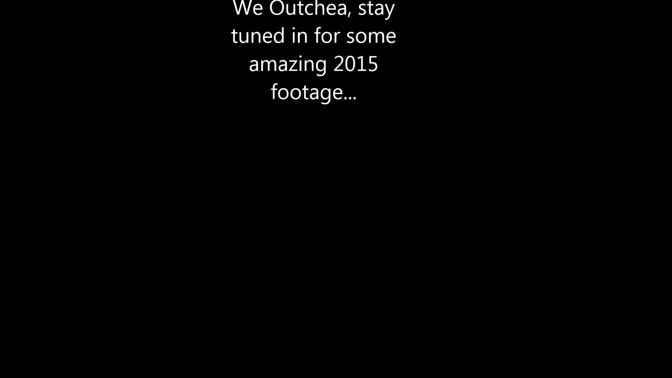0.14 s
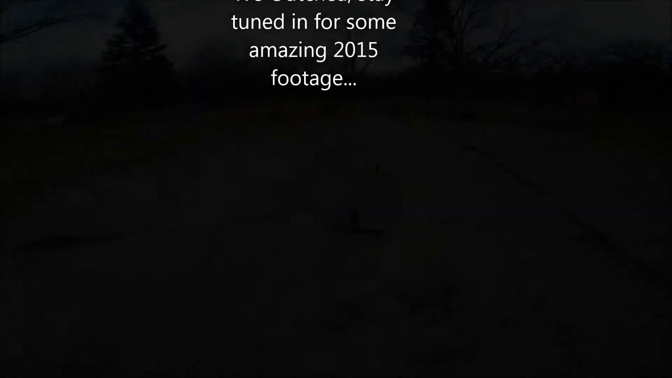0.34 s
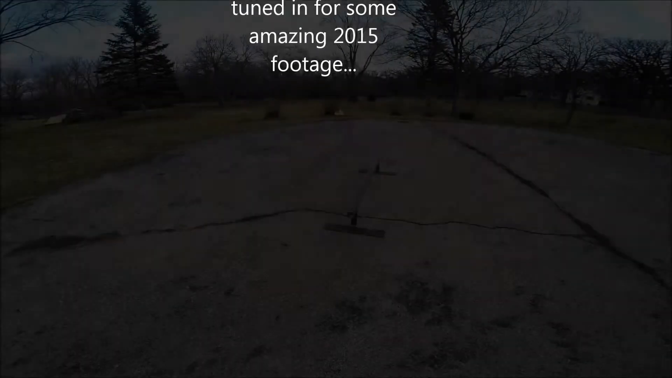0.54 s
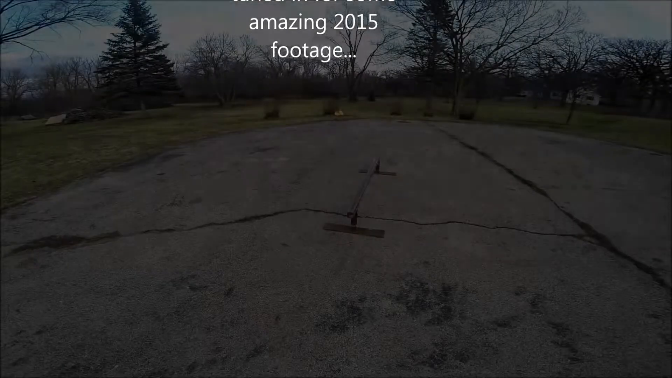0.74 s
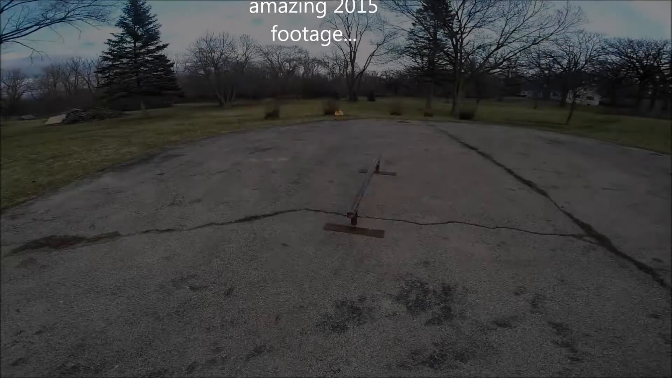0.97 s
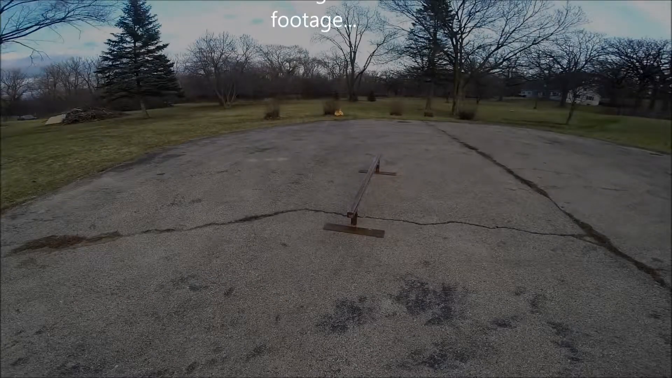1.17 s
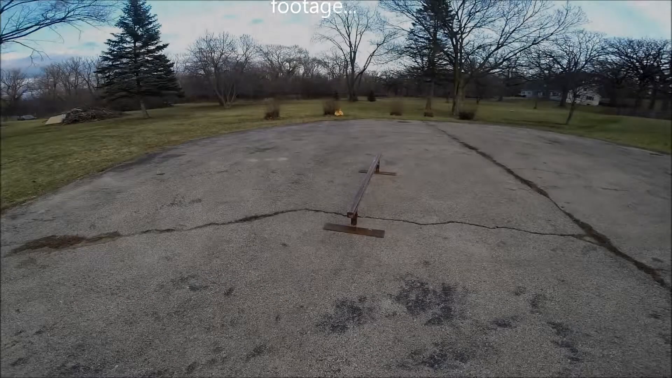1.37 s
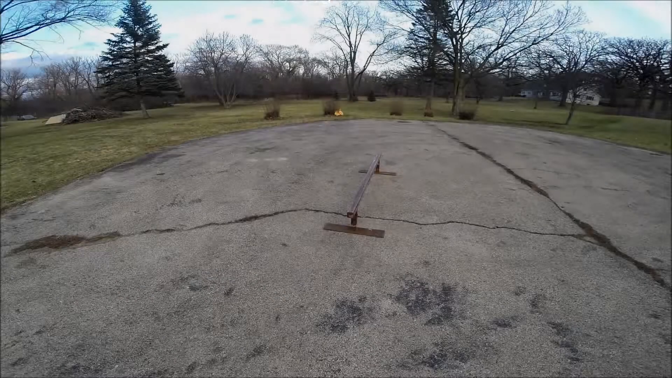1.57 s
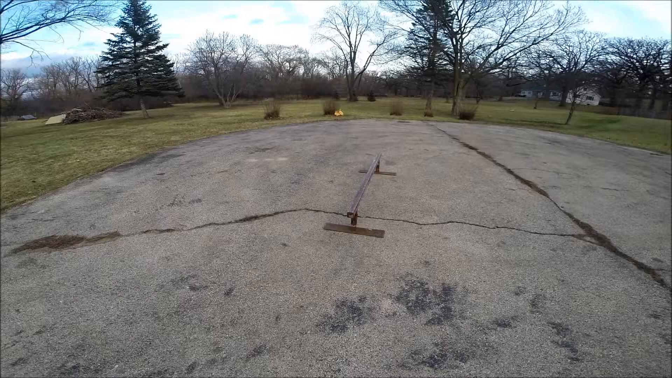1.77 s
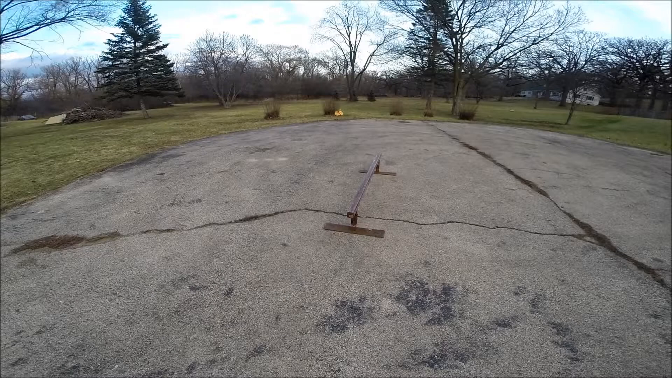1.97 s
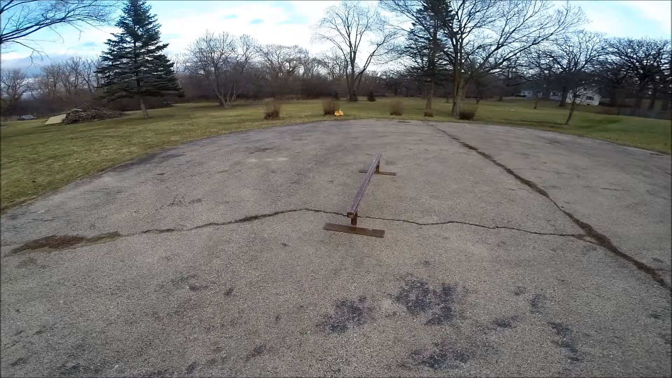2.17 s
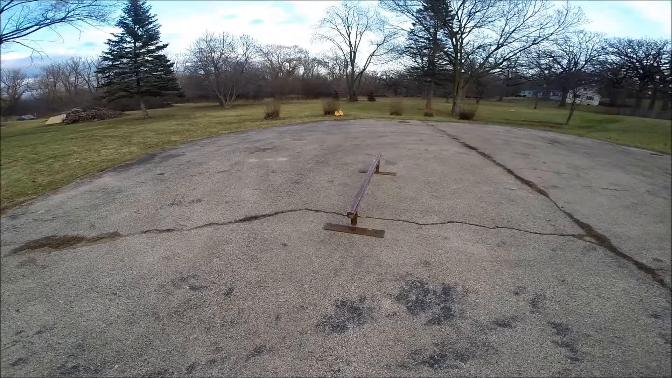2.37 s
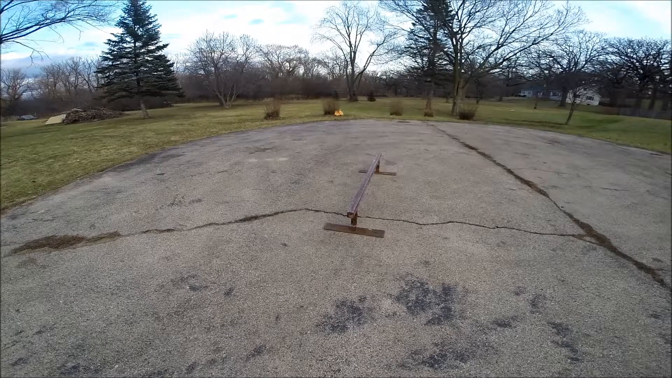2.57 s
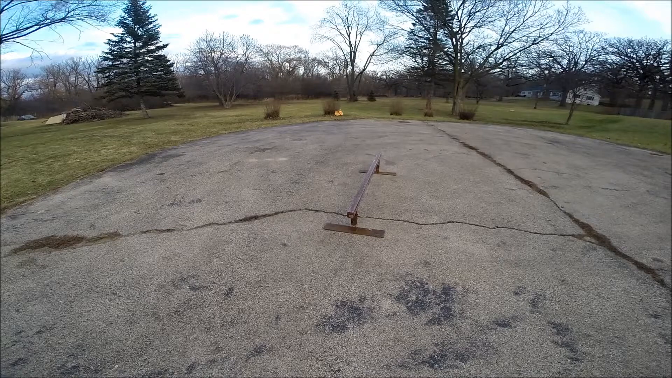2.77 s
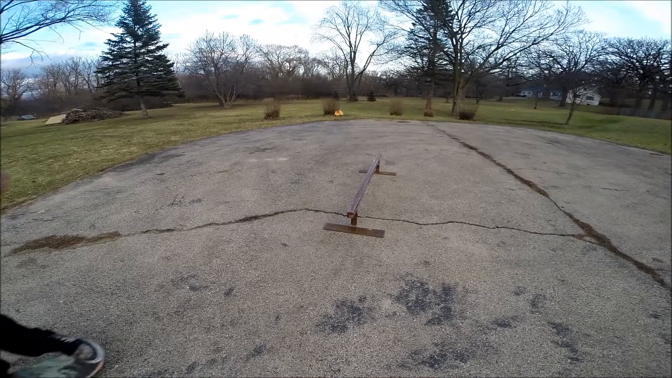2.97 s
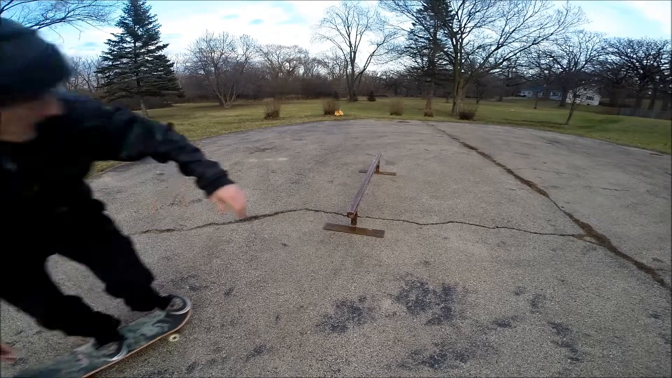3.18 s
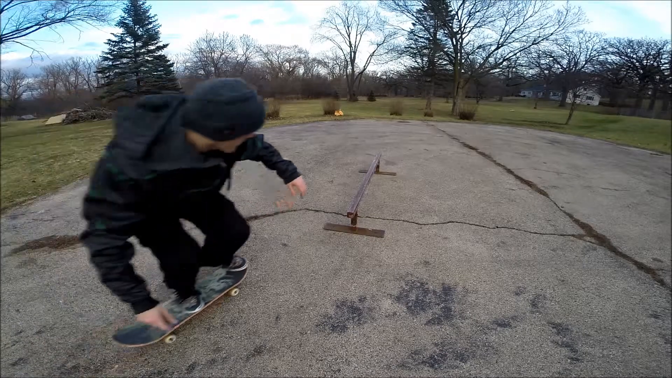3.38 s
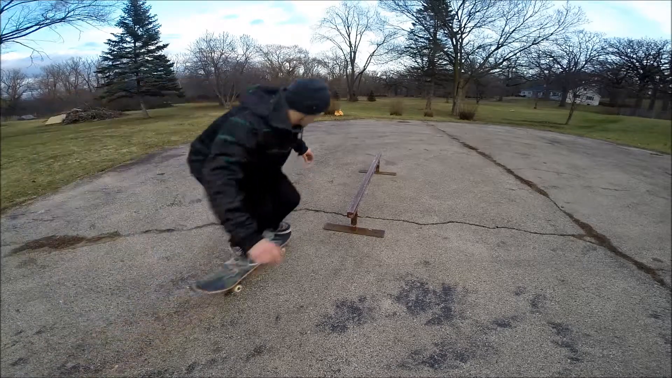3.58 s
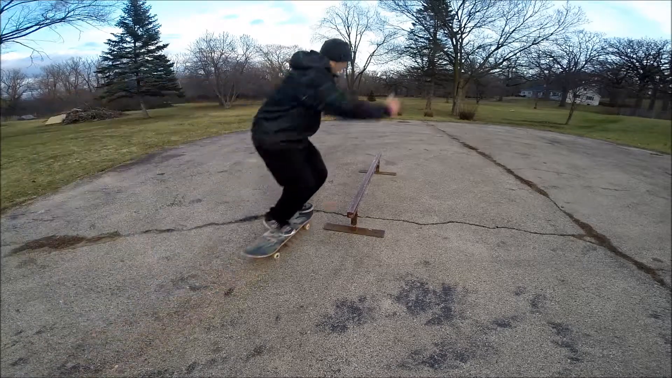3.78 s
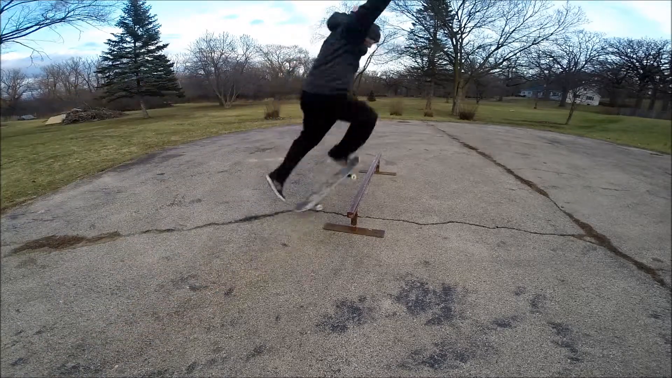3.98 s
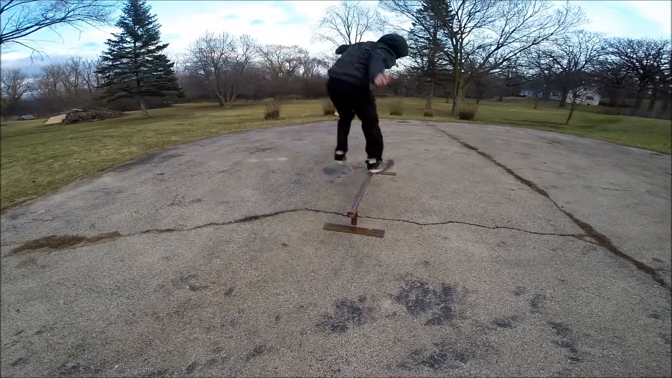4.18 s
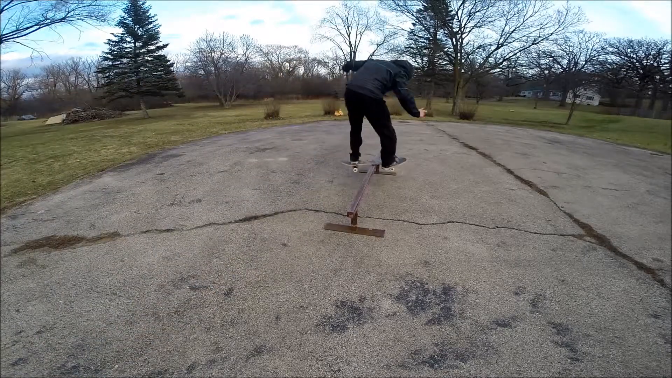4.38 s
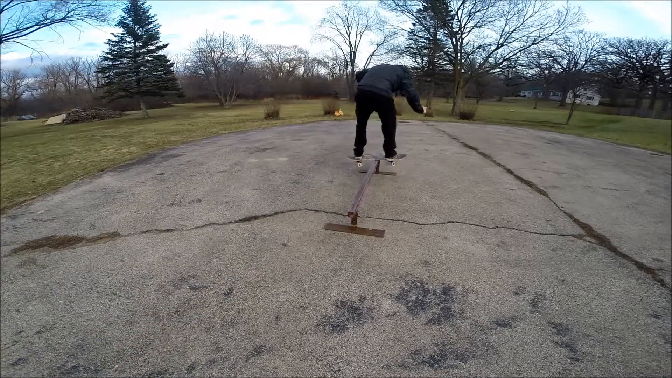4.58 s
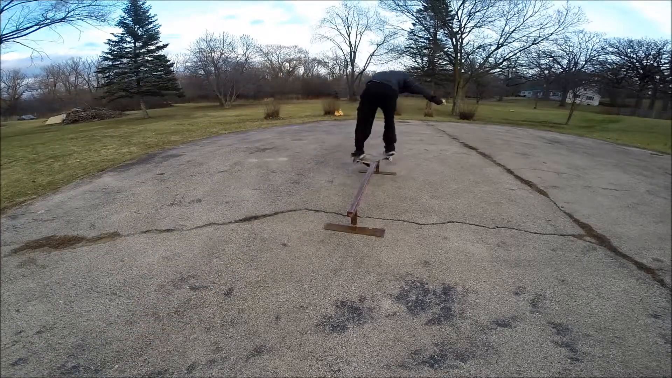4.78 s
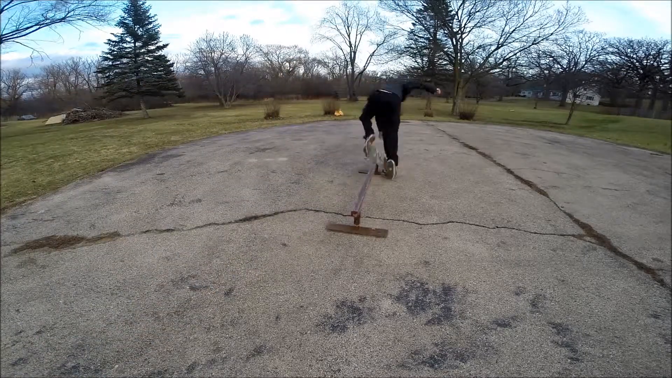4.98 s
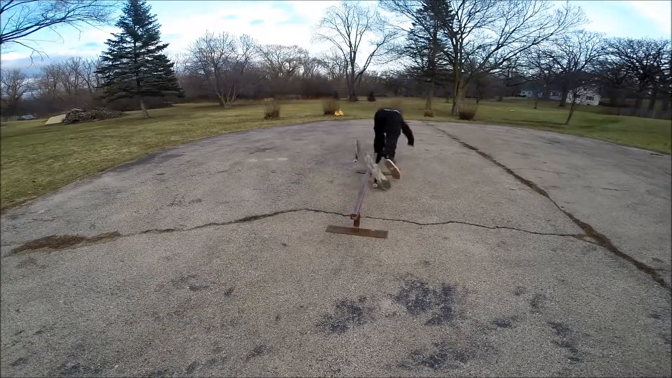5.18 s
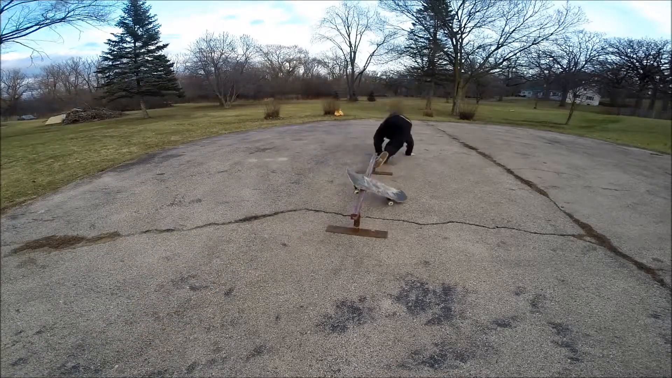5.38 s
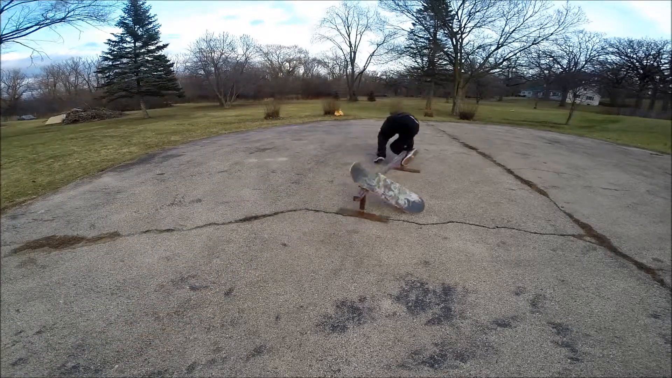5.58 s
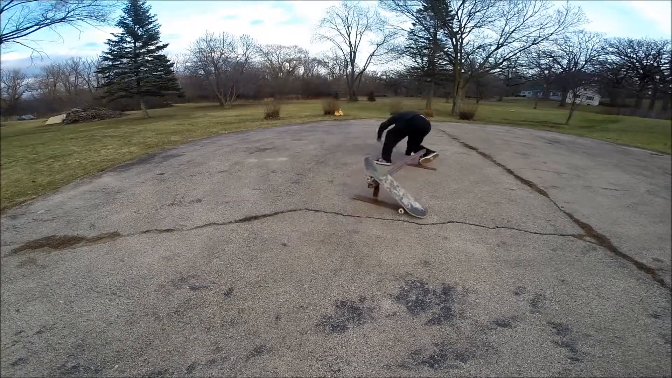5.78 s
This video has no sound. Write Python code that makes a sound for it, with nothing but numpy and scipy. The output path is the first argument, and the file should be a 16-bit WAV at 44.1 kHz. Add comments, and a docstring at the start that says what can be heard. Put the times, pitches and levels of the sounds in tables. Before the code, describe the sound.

Silence until about 0.26 s, when faint outdoor hiss, low hum and wind rumble switch on. Skateboard wheels roll faintly over rough asphalt, with tiny stones snapping, and grow steadily louder. Around 2 to 2.5 s a pushing shoe crunches on grit and wheels knock over cracks. From 2.9 to 3.9 s the board passes close: deep rumble, dry rasp, a hollow gliding growl, double wooden knocks, the strongest near 3.3 s, and short truck creaks. Rolling stops at about 4.0 s. At 4.18 to 4.33 s a dense flurry of wood and steel knocks hits the rail, followed by a very quiet slide. At 4.87 s the board slams down, and wood, shoes and metal clatter irregularly to 5.8 s. A thin steel ring sinks in pitch from 5.17 s; scrapes and a shrill, wavering squeal come at 5.63 to 5.85 s, with a faint scattered tail over the hiss.

```python
"""A skateboard rolls over rough, cracked asphalt and passes close by, then knocks and slides on a low steel rail.
It slams down, and board and shoes clatter while the rail scrapes and squeals thinly; hiss, hum and wind lie behind.
Filtered random impacts make the rolling, grit and scrapes; short noise bursts and fading tones make the blows.
Tones with a shaky pitch make the squeal, filtered noise the hiss and wind, and one wavering tone the hum."""
import sys
import numpy as np
from scipy import signal
from scipy.fft import rfft, irfft, next_fast_len
from scipy.io import wavfile
from scipy.ndimage import map_coordinates

SR = 44100
rng = np.random.default_rng(int(sys.argv[2]) if len(sys.argv) > 2 else 0)


def wav_record(signal):
    """Record a signal, one row per channel, as 16-bit PCM in the file named by sys.argv[1]."""
    frames = np.transpose(np.atleast_2d(signal))
    bounded = np.clip(frames, -1, 1)
    # unit amplitude maps onto the largest positive 16-bit level
    quanta = np.round(bounded * 32767).astype(np.int16)
    wavfile.write(sys.argv[1], SR, quanta)


N = 257544

# The tables below give the balance of pitches in a sound; its loudness is set where it is used.
# Crunch of fine grit: (frequency [Hz], level [dB])
GRIT_SPECTRUM = [(700, -19), (1400, 13), (2000, 10), (2600, -1), (3200, 0), (3900, -17.5), (4900, 6.5),
                 (6300, -1), (8000, -2), (10000, -4.5), (13000, -7.5), (15500, -23)]
# Snap of one stone: (frequency [Hz], level [dB])
SNAP_SPECTRUM = [(1500, 7), (3000, -21), (3900, -27), (4900, 8), (6300, -4.5), (8000, 0), (10000, -2.5),
                 (13000, -15), (15500, -25)]
# Dull sound of a sole on stones, and of a stone tapping a wheel: (frequency [Hz], level [dB])
SOLE_SPECTRUM = [(500, -29), (1050, 0.5), (1400, -1), (1900, -11.5), (2650, -12.5), (3300, -21),
                 (4000, -44), (10000, -63)]
# Contact noise of the wooden board: (frequency [Hz], level [dB])
THWACK_SPECTRUM = [(60, -43), (200, -14.5), (450, 2), (800, 2), (1300, -2.5), (1700, -18), (2200, -17.5),
                   (4000, -31.5), (9000, -37), (15000, -51)]
# Clank of steel: (frequency [Hz], level [dB])
CLANK_SPECTRUM = [(700, 0), (1300, 11.5), (2100, 3.5), (2900, -6.5), (3900, 6), (4700, -4), (5400, 0),
                  (6600, -9), (7300, -7), (7900, -20), (8900, -9.5), (9800, -21), (10500, -17),
                  (12000, -27), (13500, -36), (15500, -42)]
# Steel grinding on stone: (frequency [Hz], level [dB])
GRIND_SPECTRUM = [(1000, -5), (2000, 21), (2900, -5), (3900, -9), (5600, -5), (6500, -6), (7300, 0),
                  (7800, -8), (8700, 2), (9700, -24), (10700, -6), (11800, -11), (13500, -29), (15500, -44)]
# Tones of the rail when its foot slips or strikes: (frequency [Hz], level [dB])
SQUEAL_TONES = [(2579, -45.5), (2842, -52), (3160, -46), (3397, -52), (3570, -50), (3704, -44),
                (3763, -40.5), (3801, -38), (4025, -46), (4468, -43), (4628, -52), (4716, -44), (5050, -41),
                (5076, -31), (5157, -38), (5636, -42), (5695, -41), (6099, -50), (6266, -54), (6826, -58),
                (7055, -54), (7232, -49), (8323, -53), (8441, -48), (8764, -54), (9017, -48), (9109, -52),
                (10250, -53), (10697, -62), (11650, -63), (11800, -55)]


def amp(db):
    """Turn decibels into a gain."""
    return 10 ** (np.asarray(db) / 20)


def unit(x):
    """Scale a sound to an rms (average strength) of 1."""
    return x / np.sqrt(np.mean(x ** 2) + 1e-20)


def along(points, hz):
    """Read a (frequency, value) table at the given frequencies, on a log axis."""
    table_hz, values = np.transpose(points)
    return np.interp(np.log(hz + 1), np.log(table_hz + 1), values)


def curves(rows):
    """Turn each column after the time into a curve with one value per sample."""
    s, *columns = np.transpose(rows)
    return [np.interp(np.arange(N) / SR, s, column) for column in columns]


def wobble(rate):
    """A smooth random curve through `rate` random points a second."""
    points = rng.standard_normal(int(N * rate / SR) + 4)
    return map_coordinates(points, [np.arange(N) * rate / SR])


def coloured(x, spectrum):
    """Filter x to the given spectrum without smearing it backwards in time, and scale it to rms 1."""
    m = 2 * next_fast_len(len(x))
    level_db = along(spectrum, np.fft.rfftfreq(m, 1 / SR))
    # folding the cepstrum forwards gives a filter that responds only after its input
    cepstrum = irfft(np.log(amp(level_db)), m)
    cepstrum[1:m // 2] *= 2
    cepstrum[m // 2 + 1:] = 0
    response = np.exp(rfft(cepstrum))
    return unit(irfft(rfft(x, m) * response, m)[:len(x)])


def noise(spectrum, size=N):
    """Random noise with the given spectrum and rms 1."""
    return coloured(rng.standard_normal(size), spectrum)


def grains(rate, spread_db):
    """Tiny impacts at random times, about `rate` a second, with sizes scattered in decibels."""
    strikes = rng.random(N) < rate / SR
    size = amp(spread_db * np.clip(rng.standard_normal(N), -3, 3))
    return strikes * rng.choice([-1, 1], N) * size


def fade(t, t60):
    """Die away by 60 dB in t60 seconds, as a damped ring does."""
    return np.exp(-np.log(1000) * t / t60)


def add(track, s, sound):
    """Mix a sound into the track, starting at s seconds."""
    part = track[max(round(s * SR), 0):][:len(sound)]
    part += sound[:len(part)]


def stroke(s, length, attack, release):
    """Loudness shape of a scrape: it rises, holds, and from s + length dies by 60 dB in `release` seconds."""
    t = np.arange(N) / SR - s
    return np.clip(t / attack, 0, 1) * fade(np.maximum(t - length, 0), release)


def nearness(s, pass_s=3.3, width_s=0.27):
    """A smooth bump in time: 1 when the board is closest, near 0 long before and after."""
    return np.exp(-((s - pass_s) / width_s) ** 2)


def outdoors(air_db=-37.0, hum_db=-44, hum_hz=110, wind_db=0.5, hum_drop_db=-9, hum_drop_s=4.85):
    """Distant hiss, a wavering low hum and a low wind rumble; hum and wind both turn quieter near 5 s."""
    # Distant hiss: (frequency [Hz], level [dB])
    air_spectrum = [(40, -23), (150, -4), (260, -10.5), (400, -5), (560, -7.5), (760, -1.5), (880, 2),
                    (1150, -2.5), (1550, -17), (2100, -18), (2900, -34.5), (4000, -39), (6000, -34.5),
                    (10000, -48), (15000, -52)]
    # Level of the wind rumble, before wind_db and random gusts: (time [s], level [dB])
    wind_levels = [(0.27, -41.5), (1.3, -37), (2.5, -41), (3.4, -41), (4.3, -42), (4.85, -42.5),
                   (5.08, -55), (5.84, -40)]
    # Low buffeting of the wind: (frequency [Hz], level [dB])
    buffet_spectrum = [(15, -11), (28, 3), (50, -1.5), (70, 1.5), (130, -4), (220, -9), (500, -56)]
    t = np.arange(N) / SR
    hiss = amp(air_db + 1.3 * wobble(3.1)) * noise(air_spectrum)

    wavering_hz = hum_hz + 4 * wobble(24)
    hum = np.sqrt(2) * np.sin(2 * np.pi * np.cumsum(wavering_hz) / SR)
    drop = np.interp(t, [hum_drop_s, hum_drop_s + 0.13], [0, hum_drop_db])
    hum_level = hum_db + 2 * wobble(3.9) + drop

    wind, = curves(wind_levels)
    gusts = amp(wind + wind_db + wobble(5.5))
    return hiss + amp(hum_level) * hum + gusts * noise(buffet_spectrum)


def rolling(rumble_db=-4, rasp_db=-3, near_dull_db=-0.5, ground_db=0.94, lift_off_s=4.02, spin_down_s=0.36):
    """Wheels strike the asphalt's stones: the deck rumbles, the wheels rasp and growl, loose grit crackles."""
    # Loudness as the board gathers speed, passes and moves off: (time [s], level [dB])
    roll_levels = [(0.27, -41.5), (0.7, -38.5), (1.05, -33.5), (1.35, -36.5), (1.85, -31), (2.05, -28),
                   (2.21, -30), (2.48, -23.5), (2.63, -26), (2.95, -23.5), (3.06, -19.5), (3.32, -22),
                   (3.44, -25), (3.52, -18), (3.63, -22), (3.73, -23.5), (3.88, -27), (3.93, -21.5),
                   (4.0, -23)]
    # Loudness of the grit under the wheels, before later trims: (time [s], level [dB])
    grit_levels = [(0.27, -66), (0.72, -61), (0.82, -48.5), (1.15, -55.5), (1.62, -57), (1.82, -51),
                   (1.95, -45), (2.2, -49.5), (2.45, -51), (2.62, -55), (3.15, -48.5), (3.4, -52.5),
                   (3.87, -54), (3.93, -45.5), (4.03, -53)]
    # Low rumble within the rolling, before rumble_db: (time [s], level [dB])
    bass_levels = [(0.8, -5), (1.7, 4.5), (2.4, -0.5), (2.85, 2), (2.98, 3), (3.07, -4.5), (3.2, 6),
                   (3.33, 2), (3.55, 3.5), (3.7, 4), (3.93, -2.5), (4.0, -3)]
    # Rumble of the deck: (frequency [Hz], level [dB])
    rumble_spectrum = [(90, -23), (160, -11), (230, -1.5), (320, -0.5), (450, -5), (620, -4.5),
                       (900, -15.5), (1600, -42.5), (3000, -59), (9000, -82)]
    # Rasp of the wheels: (frequency [Hz], level [dB])
    rasp_spectrum = [(350, -13), (600, 3), (750, 4.5), (1050, 2.5), (1350, -5), (1650, -14), (2100, -15),
                     (2600, -26.5), (3200, -23.5), (3900, -38.5), (6000, -48), (12000, -86)]
    t = np.arange(N) / SR
    level, = curves(roll_levels)
    grit, = curves(grit_levels)
    bass, = curves(bass_levels)
    deck = amp(rumble_db + bass) * coloured(grains(rate=3000, spread_db=4), rumble_spectrum)
    rasp = coloured(grains(rate=3000, spread_db=3), rasp_spectrum)
    wheels = amp(rasp_db + near_dull_db * nearness(t)) * rasp
    board = amp(level) * (deck + wheels + growl() + wheel_ring())
    ground = ground_db * wobble(45)  # coarse and smooth patches
    contact = fade(np.maximum(t - lift_off_s, 0), spin_down_s)  # dies away once the wheels leave the ground
    return (board + crackle(grit)) * amp(ground) * contact


def crackle(level, grit_db=1.5, tick_db=-2.5, dull_hz=9000):
    """Crushed grit, sparse ticks and snapping stones, losing treble as the board moves off ahead."""
    crushed = amp(grit_db + 3.5 * wobble(90)) * coloured(grains(rate=2800, spread_db=3.0), GRIT_SPECTRUM)
    t = np.arange(SR // 50) / SR
    bursts = signal.fftconvolve(np.abs(grains(rate=130, spread_db=6)), fade(t, 0.004))[:N]
    ticks = amp(tick_db) * unit(bursts * noise(SNAP_SPECTRUM))
    near = amp(level) * (crushed + ticks) + stones()
    far = signal.lfilter(*signal.butter(2, dull_hz, fs=SR), near)
    away = np.interp(np.arange(N) / SR, [3.0, 3.6], [0, 1])
    return (1 - away) * near + away * far


def stones(level_db=-1.0, t60=0.0095, body_db=0, body_t60=0.013):
    """Single stones snap out from under a wheel and tap the wheel as they go, each a very short noise burst."""
    # The biggest stones, before later level changes: (time [s], snap [dB], tap on the wheel [dB])
    big_stones = [(0.44, -27, -27), (0.452, -31, -30), (0.539, -30, -53), (0.65, -32, -45),
                  (0.7986, -31, -26), (0.8444, -36, -37), (0.9605, -37, -29), (1.0691, -35, -37),
                  (1.2116, -29, -25), (1.359, -35, -46), (1.44, -37, -21), (1.4486, -24, -27),
                  (1.705, -32, -44), (1.7398, -20.5, -37), (1.771, -25, -39), (1.786, -20, -36),
                  (1.836, -12, -33), (1.8498, -16.5, -37), (1.9007, -33, -28), (1.9306, -19, -24.5),
                  (2.0123, -20, -18), (2.1066, -22.5, -33), (2.1346, -26.5, -36), (2.159, -26, -36),
                  (2.2511, -19.5, -34), (2.3189, -12.5, -20), (2.326, -17, -27), (2.3717, -21.5, -20),
                  (2.427, -22, -30), (2.464, -24.5, -17), (2.493, -17, -11), (2.499, -26, -16),
                  (2.6562, -23.5, -24), (2.9257, -25.5, -19), (3.3106, -28, -26), (3.898, -28, -38),
                  (3.969, -38, -30)]
    out, t = np.zeros(N), np.arange(SR // 20) / SR
    for s, snap_db, tap_db in big_stones:
        add(out, s, amp(snap_db + level_db) * noise(SNAP_SPECTRUM, size=len(t)) * fade(t, t60))
        add(out, s, amp(tap_db + body_db) * noise(SOLE_SPECTRUM, size=len(t)) * fade(t, body_t60))
    return out


def cracks(knock_db=0, second_db=-3.0, thump_db=0):
    """Two wheels drop into each crack in turn and knock the loaded deck."""
    # Cracks, with levels for the first wheel: (time [s], knock [dB], thump [dB], lag of the second wheel [s])
    crack_hits = [(0.797, -26, -21, 0.017), (2.015, -14.5, -25, 0.028), (2.117, -9.5, -20, .005),
                  (2.492, -2.5, -33, 0.0054), (2.927, -10, -18, 0.02), (3.106, -9, -21, 0.044),
                  (3.208, -9.5, -23, .016), (3.312, -3, -6, 0.038), (3.47, -11, -18, .029),
                  (3.655, -3.5, -14, 0.029), (3.771, -9.5, -35, 0.036), (3.897, -11.5, -33, 0.015)]
    out = np.zeros(N)
    for s, db, low_db, lag in crack_hits:
        for at, wheel_db in [(s, 0), (s + lag, second_db)]:
            wood = knock(pitch=1.0, thwack=2.2, thwack_t60=0.028)
            add(out, at, amp(db + wheel_db + knock_db) * wood)
            add(out, at, amp(low_db + wheel_db + thump_db) * thump(t60=0.059))
    return out


def knock(pitch, thwack, thwack_t60, mean_db=-23):
    """One knock on the wooden deck: a dull contact burst and short fading tones, varied a little each time."""
    # Tones of the deck, before pitch and random changes: (frequency [Hz], level [dB], 60 dB decay time [s])
    deck_tones = [(434, -9.5, 0.1), (590, -9, 0.059), (750, 7, 0.029), (887, -0.5, 0.059),
                  (1059, 0.5, 0.041), (1307, -9.5, 0.042), (1910, -12, 0.029), (2276, -10, 0.027)]
    t = np.arange(SR // 6) / SR
    ring = np.zeros(len(t))
    for hz, db, t60 in deck_tones:
        tone_hz = hz * pitch * rng.normal(1, 0.025)
        tone = np.sin(2 * np.pi * tone_hz * t + rng.uniform(0, 2 * np.pi))
        ring += amp(db + rng.normal(0, 3.9)) * fade(t, t60) * tone
    contact = thwack * noise(THWACK_SPECTRUM, size=len(t)) * fade(t, thwack_t60)
    hit = (ring + contact) * (1 - np.exp(-t / 0.00039))  # a very quick, soft start
    return amp(mean_db) * unit(hit)  # this low average leaves the peak near 1


def thump(t60):
    """The low push of a loaded deck: a quickly fading burst of low noise."""
    # Low push: (frequency [Hz], level [dB])
    thump_spectrum = [(40, -21), (130, -12.5), (250, 3.5), (420, -3), (600, -4), (1500, -72), (6000, -98)]
    t = np.arange(SR // 4) / SR
    return noise(thump_spectrum, size=len(t)) * fade(t, t60) * (1 - np.exp(-t / 0.00073))


def growl(level_db=-1, shake_rate=230, onset_s=1.94, rise_s=0.13):
    """The wheels' hollow resonance glides as the board carves past, shaken at random by the ground."""
    # Gliding growl, before level_db: (time [s], centre [Hz], level relative to the rolling [dB])
    growl_path = [(2.1, 739, -2), (2.3, 691.8, -16), (2.75, 431.5, -8.5), (2.95, 520, 0.5),
                  (3.08, 672.8, 1), (3.2, 590, -4.5), (3.33, 439.8, 1.5), (3.66, 371, -3), (3.9, 331, -22)]
    centre, share = curves(growl_path)
    shake = wobble(shake_rate) + 1j * wobble(shake_rate)  # spreads the tone into a band
    rise = np.clip((np.arange(N) / SR - onset_s) / rise_s, 0, 1)  # once up to speed
    carrier = np.exp(2j * np.pi * np.cumsum(centre) / SR)
    return rise * amp(share + level_db) * unit(np.real(shake * carrier))


def scuff(level_db=0, grit_db=-6, attack_s=0.016, release_s=0.5):
    """A pushing shoe crunches over loose stones: many tiny impacts, filtered as sole and grit."""
    # Scuffs, before random crunching: (time [s], length before the release [s], level [dB])
    shoe_scuffs = [(1.956, 0.083, -35), (2.28, 0.25, -34.5)]
    level = sum(amp(db) * stroke(s, length, attack_s, release_s) for s, length, db in shoe_scuffs)
    sole = amp(level_db) * coloured(grains(rate=1800, spread_db=5.5), SOLE_SPECTRUM)
    grit = amp(grit_db) * coloured(grains(rate=1700, spread_db=5.5), GRIT_SPECTRUM)
    return level * amp(4.1 * wobble(80)) * (sole + grit)


def wheel_ring(level_db=-25, ring_hz=3100, shake_rate=600, rattle_db=3):
    """The hard wheels ring faintly with the jolts, a randomly shaken tone heard only close by."""
    t = np.arange(N) / SR
    shake = wobble(shake_rate) + 1j * wobble(shake_rate)
    ring = unit(np.real(shake * np.exp(2j * np.pi * ring_hz * t)))
    return amp(level_db + rattle_db * wobble(70)) * nearness(t) * ring


def creaks(level_db=-5.5, t60=0.031, rough=1.0):
    """The trucks creak in short rough chirps as the rider leans and crouches."""
    # Creaks, before level_db: (time [s], level [dB], frequency [Hz])
    truck_creaks = [(3.0205, -11, 2040), (3.0674, -14, 1960), (3.1822, -12.5, 1880), (3.2196, -21, 1680),
                    (3.912, -12, 2190), (3.9614, -17.5, 1840)]
    out, t = np.zeros(N), np.arange(SR // 10) / SR
    for s, db, hz in truck_creaks:
        phase = 2 * np.pi * hz * t + rough * wobble(620)[:len(t)]
        chirp = np.sin(phase) * fade(t, t60) * (1 - np.exp(-t / 0.00074))
        add(out, s, amp(db + level_db) * chirp)
    return out


def drag(wood_db=-1, steel_db=-10.5, chatter_db=2.5, attack_s=0.015, release_s=0.25):
    """The board drags on rail and ground: wood and steel scrape and chatter, the steel in many tiny catches."""
    # Drags, before later level changes: (time [s], length before the release [s], level [dB])
    board_drags = [(4.177, 0.03, -33), (4.246, 0.12, -33), (4.353, .51, -49), (4.868, 0.032, -20.5),
                   (5.028, 0.031, -28.5), (5.078, 0.11, -33.5), (5.458, 0.1, -32.5), (5.625, 0.096, -22.5),
                   (5.77, .08, -31.5)]
    level = sum(amp(db) * stroke(s, length, attack_s, release_s) for s, length, db in board_drags)
    wood = amp(wood_db) * noise(THWACK_SPECTRUM)
    steel = amp(steel_db) * coloured(grains(rate=2200, spread_db=5), CLANK_SPECTRUM)
    return level * amp(chatter_db * wobble(160)) * (wood + steel)


def blows(wood_db=0, slap_s=0.00449, slap_db=-8.5, loaded_db=-15, free_db=-20, foot_db=-3, step_off_s=4.4,
          click_db=-7, click_t60=0.013):
    """Each blow knocks the wood twice, clanks the steel and thumps, more so with the rider still on the board."""
    # Board, trucks and shoes on rail and ground: (time [s], wood level [dB], steel level [dB], wood pitch ratio)
    board_blows = [(4.179, -8, -32, 1.06), (4.189, -15, -44, 1.01), (4.202, -1.5, -40, 1.03),
                   (4.21, -10, -49, 1), (4.2336, -5, -22.5, 0.59), (4.237, 1.5, -35, 1),
                   (4.2528, -14, -23.5, 1), (4.26, -5.5, -33, 0.95), (4.284, -7.5, -37, 1.05),
                   (4.296, -5, -25, 1.03), (4.299, -6, -24.5, .95), (4.318, -7.5, -34, .9),
                   (4.329, -6, -27.5, 1.1), (4.874, -17, -50, 0.77), (4.88, -1.5, -31.5, 0.91),
                   (4.889, -1, -34, 0.88), (4.895, -5.5, -39, .95), (4.901, -11, -23.5, 0.95),
                   (4.923, -21, -25.5, 1), (4.956, -17, -28, 0.87), (4.969, -7.5, -37, 1.1),
                   (5.002, -1.5, -19.5, 1.08), (5.022, -28, -20.5, 0.77), (5.091, -24, -31.5, 1.2),
                   (5.119, -12.5, -28.5, 0.97), (5.138, -36, -27.5, 1), (5.173, -19.5, -30.5, 0.67),
                   (5.183, -20, -32, .9), (5.332, -6.5, -38, 1.04), (5.392, -12.5, -46, 0.88),
                   (5.428, -13, -49, 1.07), (5.467, -11.5, -34, 1.34), (5.477, -18, -41, 0.89),
                   (5.526, -17, -51, 0.89), (5.545, -19, -56, 1.05), (5.579, -17, -25, 1.23),
                   (5.643, -8, -26.5, 0.88), (5.68, -9, -25, 1.16), (5.698, -14, -30, 1.03),
                   (5.708, -20.5, -22.5, 1.14), (5.831, -14, -28.5, 0.85)]
    out, t = np.zeros(N), np.arange(SR // 20) / SR
    for s, db, steel_db, pitch in board_blows:
        for delay, again_db in [(0, 0), (slap_s, slap_db)]:  # the deck flexes and slaps again
            wood = knock(pitch, thwack=1.84, thwack_t60=0.03)
            add(out, s + delay, amp(db + wood_db + again_db) * wood)
        add(out, s, amp(steel_db) * clank())
        click = noise(GRIND_SPECTRUM, size=len(t)) * fade(t, click_t60)  # the hard first contact
        add(out, s, amp(steel_db + click_db) * click)
        weight = amp(db + (loaded_db if s < step_off_s else free_db))
        foot = amp(steel_db + foot_db)  # the rail's foot thuds too
        add(out, s, np.hypot(weight, foot) * thump(t60=0.071))
    return out


def clank(clank_db=2, ring_db=-7.5, clank_t60=0.096, ring_t60=0.16):
    """Steel meets steel: a noise burst for the trucks' clank, fading tones for the rail left ringing."""
    # Tones of the rail, before random changes: (frequency [Hz], level [dB])
    rail_tones = [(2137, -47), (2358, -47), (2745, -50), (3160, -42.5), (3408, -63), (3693, -53),
                  (3797, -54), (3935, -44.5), (4026, -42), (4204, -55), (4520, -38), (4721, -58),
                  (5087, -54.5), (5362, -52), (5647, -58), (5760, -51), (6115, -56), (6616, -65),
                  (7270, -61), (8436, -53), (8974, -59), (10212, -67), (11660, -71)]
    t = np.arange(SR // 3) / SR
    hz, mode_db = np.transpose(rail_tones)
    decays = fade(t, ring_t60 * np.sqrt(4000 / hz[:, None]))  # ring_t60 holds at 4000 Hz; higher tones die sooner
    shares = amp(mode_db) * rng.standard_normal(len(hz))  # each spot wakes other tones
    loaded_hz = hz * rng.normal(1, 0.005, len(hz))  # the load on the rail detunes them
    tones = decays * np.sin(2 * np.pi * loaded_hz[:, None] * t)
    ring = shares @ tones / np.linalg.norm(shares)
    burst = noise(CLANK_SPECTRUM, size=len(t)) * fade(t, clank_t60)
    return amp(clank_db) * burst + amp(ring_db) * ring


def foot_taps(level_db=0, t60=0.12, bright_db=5):
    """The rail's bare foot strikes asphalt and rings with the tones of its squeal, the high ones boosted."""
    # Taps of the foot: (time [s], level [dB])
    taps = [(4.18, -35), (4.2525, -29), (5.003, -30), (5.579, -30.5)]
    out, t = np.zeros(N), np.arange(SR // 5) / SR
    hz, mode_db = np.transpose(SQUEAL_TONES)
    boost_db = bright_db * np.log2(hz / hz[0])  # bright_db more for each octave up
    for s, db in taps:
        shares = amp(mode_db + boost_db + rng.normal(0, 2.6, len(hz)))
        ring = shares @ np.sin(2 * np.pi * (hz[:, None] * t + rng.random((len(hz), 1))))
        add(out, s, amp(db + level_db) * unit(ring) * fade(t, t60))
    return out


def axle_ping(s=5.172, level_db=-43, ring_hz=5420, sag_hz_per_s=600, waver=1.1, t60=0.38):
    """A steel part, probably an axle, is struck free and rings on as one fading tone, wavering and sinking."""
    t = np.maximum(np.arange(N) / SR - s, 0)
    phase = 2 * np.pi * (ring_hz - sag_hz_per_s * t / 2) * t + waver * wobble(220)
    return amp(level_db) * (t > 0) * fade(t, t60) * np.sin(phase)


def squeal(level_db=0, waver_hz=40, grit_db=-11):
    """The rail's foot slips on asphalt in short bursts; the steel sings, wavering in pitch and level."""
    # Slips of the foot: (time [s], level [dB], time scale of the swell [s], pitch ratio)
    foot_slips = [(5.675, -28, 0.022, .992), (5.693, -22, 0.026, 1), (5.73, -23, 0.015, 1),
                  (5.758, -28, 0.017, 1.003), (5.781, -27, 0.034, .996), (5.803, -30, 0.021, 1)]
    out, t = np.zeros(N), np.arange(SR // 4) / SR

    def drift(rate):
        """A random curve of straight lines between `rate` points a second."""
        return np.interp(t * rate, np.arange(rate), rng.standard_normal(rate))

    for s, db, length, pitch in foot_slips:
        tones = np.zeros(len(t))
        for hz, mode_db in SQUEAL_TONES:
            bend = 1 + 0.003 * drift(30)
            jitter_hz = waver_hz * drift(250)  # the foot quickly sticks and slips
            slip_hz = hz * pitch * bend + jitter_hz
            turns = np.cumsum(slip_hz) / SR + rng.random()
            tones += amp(mode_db + 4 * drift(150)) * np.sin(2 * np.pi * turns)
        grind = amp(grit_db + 3 * drift(400)) * noise(GRIND_SPECTRUM, size=len(t))
        u = t / length
        push = 2 * np.e * u * np.exp(-2 * u - u ** 2 / 2)  # swells, then sticks again
        add(out, s, amp(db + level_db) * push * (unit(tones) + grind))
    return out


def yard(x):
    """Trees around the lot scatter a faint tail back: noise that fades at its own speed for each pitch."""
    # Length of the tail: (frequency [Hz], 60 dB decay time [s])
    tail_times = [(150, 0.49), (1000, 0.55), (2300, 0.9), (4000, 0.82), (8000, 0.3), (14000, 0.15)]
    hz, t, z = signal.stft(rng.standard_normal(SR), SR, nperseg=256)
    fading = z * fade(t, along(tail_times, hz)[:, None])
    tail = signal.istft(fading, SR, nperseg=256)[1]
    return signal.fftconvolve(x, tail / np.linalg.norm(tail))[:N]


def scene():
    """The ride and the fall in the open lot; only the fall gets the scattered tail."""
    ride = rolling() + cracks() + scuff() + creaks()
    fall = drag() + blows() + foot_taps() + axle_ping() + squeal()
    return (outdoors() + ride + fall + amp(-15.5) * yard(fall))[None]


def record(dry):
    """Switch the sound on, round off the highest peaks and keep nothing above the band limit."""
    start_s, top_hz = 0.263, 15200
    x = dry * (np.arange(N) / SR >= start_s)
    x = x / (1 + np.abs(x) ** 6) ** (1 / 6)  # bends peaks smoothly to stay below 1
    m = next_fast_len(N + SR // 2)
    keep = np.fft.rfftfreq(m, 1 / SR) < top_hz
    return irfft(rfft(x, m) * keep, m)[..., :N]


dry = scene()
out = record(dry)
wav_record(out)
```